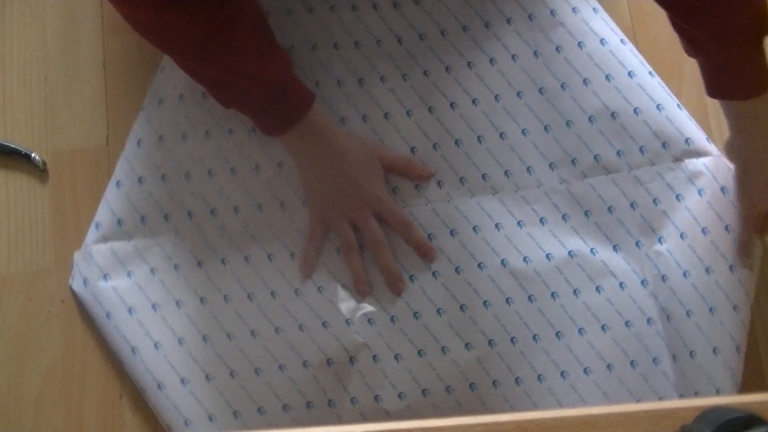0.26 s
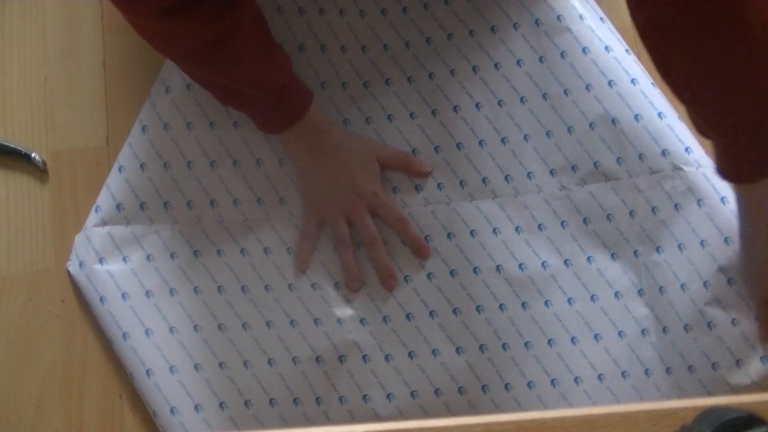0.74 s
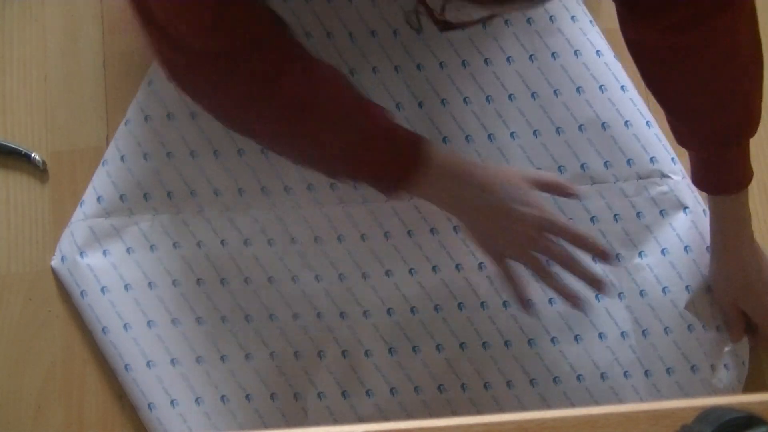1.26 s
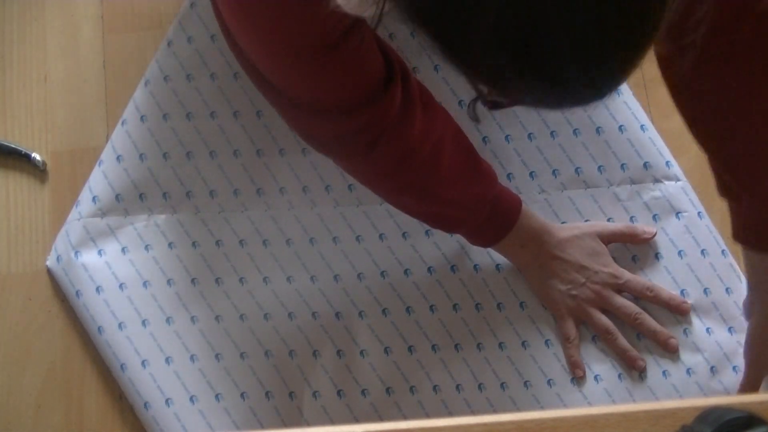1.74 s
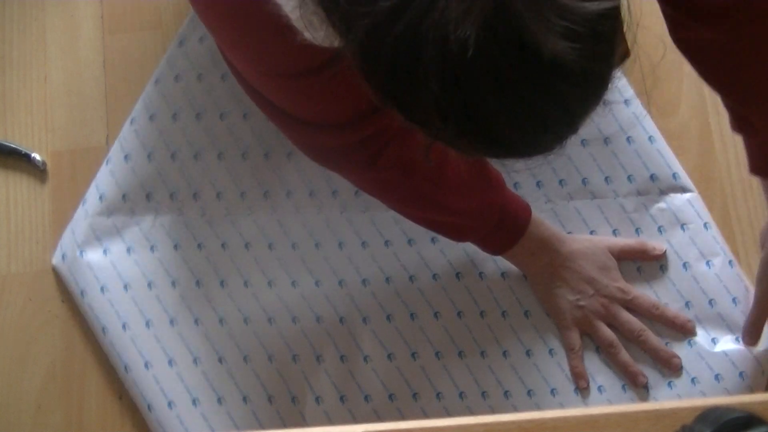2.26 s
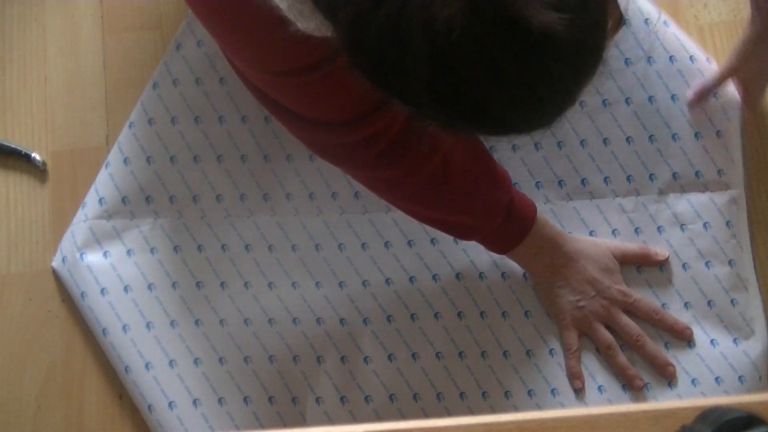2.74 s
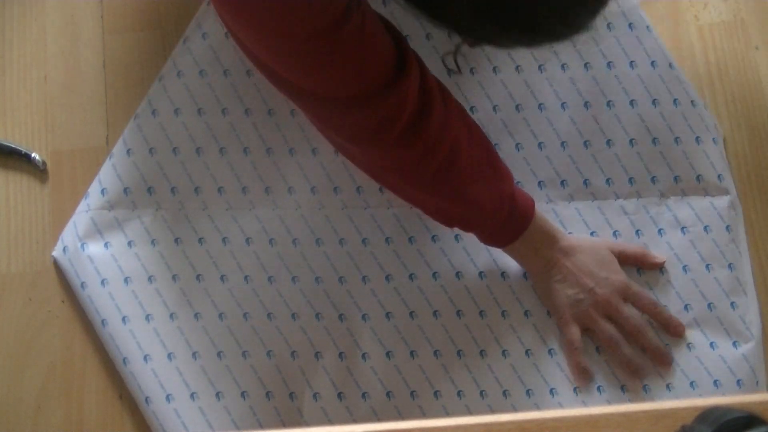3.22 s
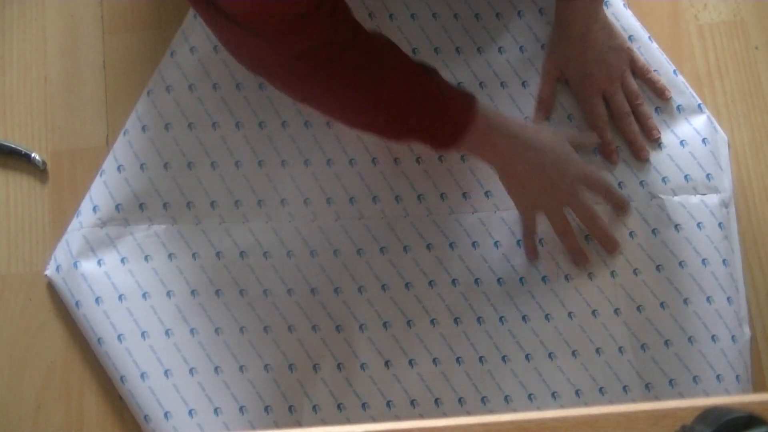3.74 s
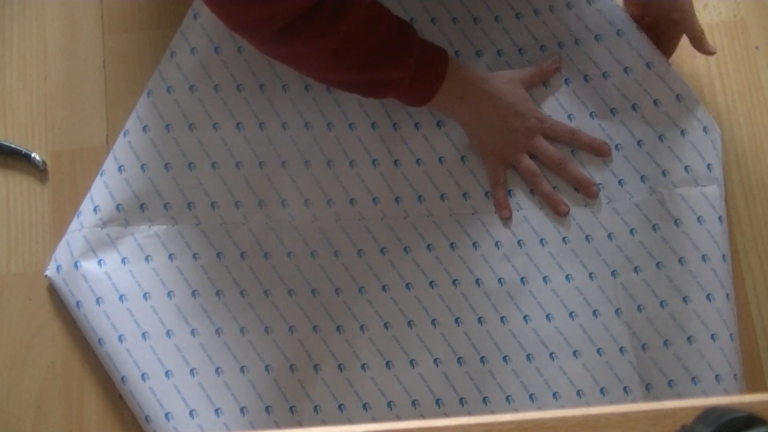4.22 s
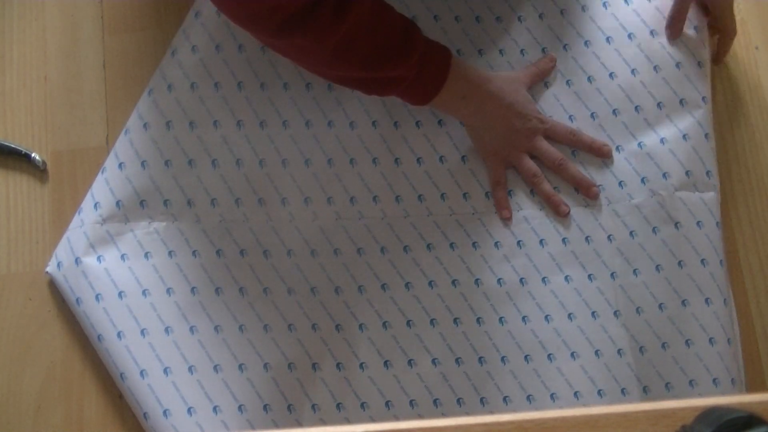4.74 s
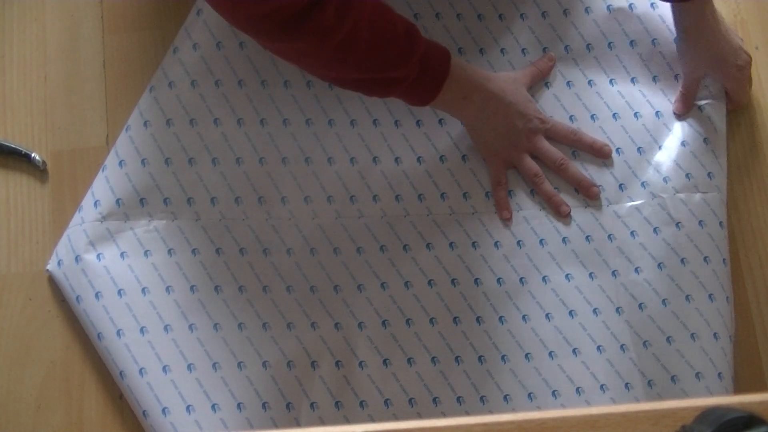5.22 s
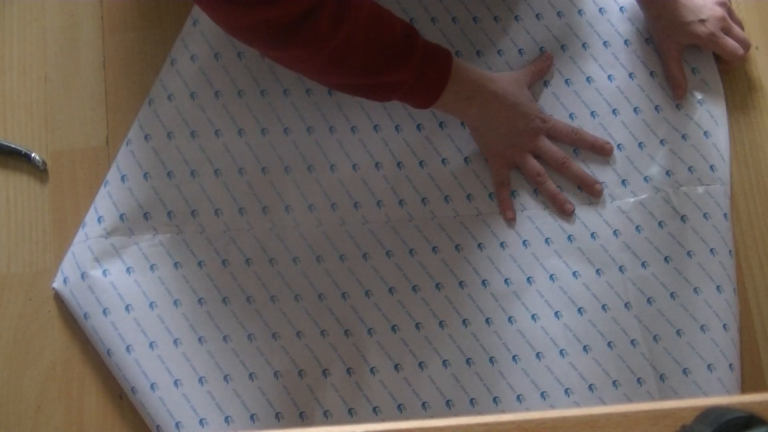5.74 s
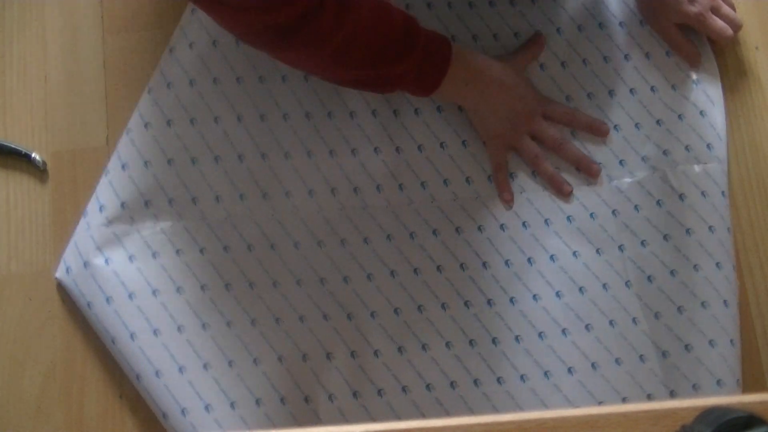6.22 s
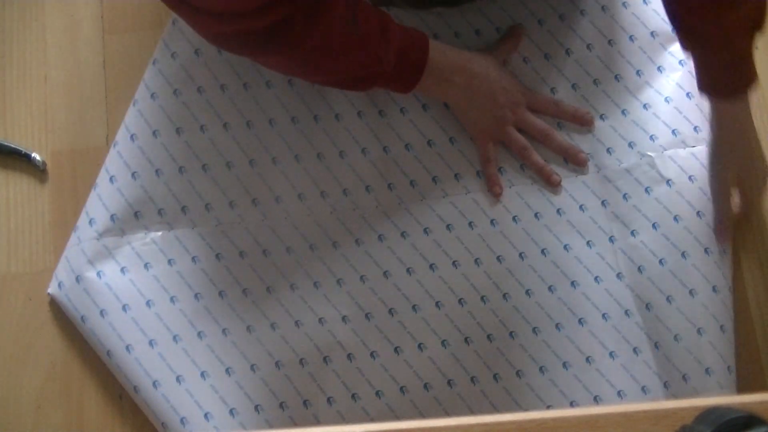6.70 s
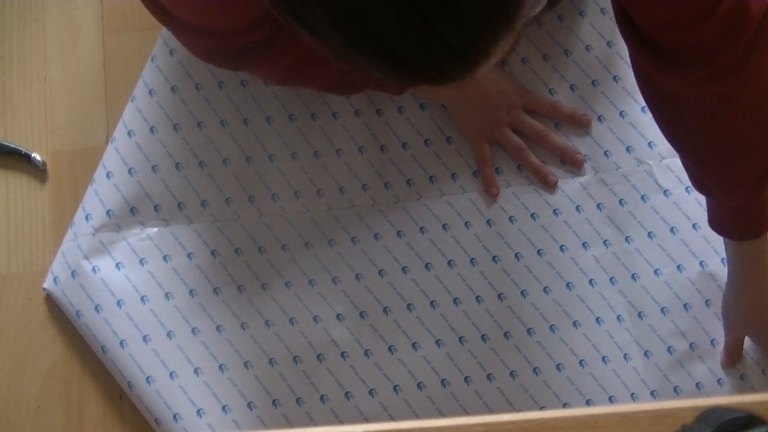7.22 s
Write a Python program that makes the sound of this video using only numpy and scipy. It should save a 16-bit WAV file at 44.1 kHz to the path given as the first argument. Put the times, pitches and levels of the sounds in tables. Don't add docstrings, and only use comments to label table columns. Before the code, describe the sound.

Stiff paper rustles and crinkles under sliding palms, with a very loud sharp crack near three seconds, crunchy folds and soft floor thumps.

```python
import sys
import numpy as np
from scipy import signal
from scipy.fft import rfft, irfft, next_fast_len
from scipy.io import wavfile
from scipy.ndimage import uniform_filter1d, map_coordinates

SR = 44100
rng = np.random.default_rng(int(sys.argv[2]) if len(sys.argv) > 2 else 0)


def dump_mix(stems):
    frames = np.atleast_2d(stems).T
    limited = np.clip(frames, -1, 1)
    pcm = np.round(limited * 32767).astype(np.int16)
    wavfile.write(sys.argv[1], SR, pcm)


def attenuation_scalar(level_db):
    decades = np.asarray(level_db, float) / 20
    return 10 ** decades


N = 328986


def unit(x):
    return x / np.sqrt(np.mean(x ** 2) + 1e-20)


def along(points, hz):
    f, v = np.transpose(points)
    return np.interp(np.log(hz + 1), np.log(f + 1), v)


def wobble(rate):
    knots = rng.standard_normal(int(N * rate / SR) + 4)
    return map_coordinates(knots, [np.arange(N) * rate / SR])


def filtered(x, response):
    m = next_fast_len(N + SR // 2)
    return irfft(rfft(x, m) * response(np.fft.rfftfreq(m, 1 / SR)), m)[..., :N]


def kernel(spectrum):
    magnitude = attenuation_scalar(along(spectrum, np.fft.rfftfreq(4096, 1 / SR)))
    cep = irfft(np.log(magnitude + 1e-6))
    cep[1:2048] *= 2
    cep[2049:] = 0
    return irfft(np.exp(rfft(cep)))


def coloured(x, spectrum):
    return signal.fftconvolve(x, kernel(spectrum)[None], axes=1)[:, :N]


def bands(x):
    def cut(hz, kind):
        return signal.sosfilt(signal.butter(4, hz, kind, fs=SR, output="sos"), x)
    return cut(2000, "low"), cut([2000, 7000], "band"), cut(7000, "high")


def spread(pair):
    # frequency in Hz, likeness of left and right (1 = same)
    likeness = [(60, 0.029), (290, 0), (640, 0.44), (1410, 0.83), (3100, 0.59), (6820, 0.97), (11000, 0.14),
                (15000, 0)]

    def mid_side(hz):
        turn = np.arccos(np.clip(along(likeness, hz), -1, 1)) / 2
        return np.array([np.cos(turn), np.sin(turn)])
    mid, side = filtered(pair, mid_side)
    return np.array([mid + side, mid - side])


def swells(s, rise, fade, db):
    t = np.arange(0, N / SR + .002, .002)[:, None]
    away = np.where(t < s, (s - t) / rise, (t - s) / fade)
    power = np.sum(attenuation_scalar(2 * (db - 10 * away ** 1.2)), axis=-1)
    return np.interp(np.arange(N) / SR, t[:, 0], np.sqrt(power))


def creases(rate, scatter_db, clump):
    chance = rate / SR * np.exp(clump * np.clip(wobble(60), -2, 1.2))
    size = attenuation_scalar(scatter_db * np.minimum(rng.exponential(size=N), 3))
    sign = np.sign(rng.standard_normal(N))
    return unit(size * sign * (rng.random(N) < chance))


def roomy():
    z = signal.stft(rng.standard_normal((2, N)), nperseg=1024)[2]
    field = unit(uniform_filter1d(rng.standard_normal(z.shape[1:]), size=13, axis=1))
    resonant = z * attenuation_scalar(3.8 * np.clip(field, -1.5, 2.2))
    return unit(signal.istft(resonant, nperseg=1024)[1][:, :N])


def crackle(spectrum, rate, share):
    fine = creases(rate, scatter_db=1.5, clump=0.3)
    coarse = 0.19 * creases(rate, scatter_db=5.0, clump=0.4)
    hiss = roomy() * attenuation_scalar(0.9 * np.tanh(wobble(25)) + 0.6 * wobble(80))
    sheet = coloured(spread(hiss + share * np.array([fine, coarse])), spectrum)
    return [unit(b) for b in bands(sheet)]


def tails(energy, rise, share):
    room_t60 = [0.41, 0.31, 0.13]
    # frequency in Hz, crack spectrum in dB per Hz
    crack_colour = [(150, -49), (250, -30.5), (640, -6.5), (955, -1), (1160, 3), (1950, -4), (2670, -0.5),
                    (3010, -5), (3840, 0.5), (4730, -1), (6000, -17), (9010, -34), (11500, -39.5),
                    (16000, -54)]
    keep = np.exp(-1 / (rise * SR))
    out = 0
    for burst, t60, band in zip(energy, room_t60, crackle(crack_colour, 1500, share)):
        fade = signal.lfilter([1], [1, -attenuation_scalar(-120 / t60 / SR)], burst)
        power = signal.lfilter([1 - keep], [1, -keep], fade)
        out = out + np.sqrt(np.abs(power)) * band
    return out


def rustle():
    # time of most speed in s, speeding up in s, slowing down in s, level in dB, crispness in dB rel
    palm_slides = [(0.47, 0.21, 0.16, -36, -13), (0.911, 0.19, 0.12, -37, -18.5),
                   (1.33, 0.17, 0.25, -49.5, -30), (1.87, 0.38, 0.15, -42, -5.5),
                   (2.32, 0.094, 0.18, -33, -10), (2.55, 0.072, 0.12, -35.5, -9),
                   (2.76, 0.34, 0.18, -29.5, -14.5), (3.26, 0.16, 0.091, -38.5, -27),
                   (3.6, .13, 0.042, -41, -15), (3.99, 0.11, 0.21, -43, -13.5),
                   (5.079, 0.21, 0.11, -37, -12), (5.4, 0.096, 0.063, -40, -10),
                   (5.31, 0.1, 0.032, -59, -16), (5.56, 0.29, 0.03, -41, -18), (6.11, 0.14, .1, -36.5, -15),
                   (6.34, 0.097, 0.097, -39, -16.5), (6.7, 0.18, 0.4, -37, -11),
                   (6.93, 0.12, 0.04, -43, -10), (7.24, .06, 0.088, -46, -6)]
    # peak time in s, fade in s, level in dB, sheet body in dB rel
    finger_tugs = [(0.038, 0.099, -42, -3), (0.16, 0.08, -42.5, 0.5), (0.31, 0.076, -37, -7),
                   (0.73, 0.22, -44, 2.5), (1.03, 0.08, -47, 3.5), (1.17, 0.35, -64, 10.5),
                   (1.538, 0.053, -38.5, 0), (2.098, 0.31, -40, -6.5), (3.092, 0.064, -30.5, -1),
                   (3.17, 0.11, -38.5, 1), (3.47, 0.2, -45.5, 0.5), (3.84, 0.34, -46, -10),
                   (4.11, 0.028, -51, 0), (4.199, 0.062, -40.5, -0.5), (4.34, 0.08, -35, -4),
                   (4.508, 0.091, -32, -1), (4.73, 0.068, -41, -1.5), (4.91, 0.079, -42, -5),
                   (5.752, 0.044, -44, -15), (5.9, 0.11, -43, -5), (6.5, 0.29, -39.5, -6.5),
                   (7.12, 0.073, -51, 5), (7.42, 0.14, -53.5, -8)]
    # frequency in Hz, paper spectrum in dB per Hz
    paper_colour = [(180, -61.5), (300, -26.5), (574, -11.5), (614, -10), (787, -6.5), (1140, -7.5),
                    (1560, -7), (2440, -3.5), (3190, -1.5), (3640, 2.5), (4750, 4.5), (6960, -12),
                    (9880, -13.5), (16000, -41)]
    lifted_s = 6.55
    s, rise, fade, db, crisp_db = np.transpose(palm_slides)
    at, tug_fade, tug_db, body_db = np.transpose(finger_tugs)

    def slide(rel_db):
        return swells(s, rise, fade, db + rel_db)

    def tug(rel_db):
        return swells(at, 0.55 * tug_fade, tug_fade, tug_db + rel_db)

    faster_db = db + 39.5
    slide_body_db = -6 - 0.62 * faster_db - 1.5 * (s > lifted_s)
    tug_crisp_db = -10 + 0.47 * body_db
    body, middle, top = crackle(paper_colour, rate=1600, share=.95)
    boom = filtered(body, lambda hz: hz < 650)
    body = body - 0.73 * boom * np.clip((np.arange(N) / SR - lifted_s) * 10, 0, 1)

    sizzle = filtered(top, lambda hz: 1 / (1 + (12700 / (hz + 1)) ** 8))
    sizzle_db = crisp_db - 3 + 0.55 * faster_db
    return (np.hypot(slide(slide_body_db), tug(body_db)) * attenuation_scalar(0.58 * np.tanh(wobble(23))) * body
            + np.hypot(slide(0), tug(0)) * middle
            + np.hypot(slide(crisp_db), tug(tug_crisp_db)) * top
            + slide(sizzle_db) * sizzle)


def crunches():
    # time in s, peak in dB, body in dB rel, crispness in dB rel
    bunches = [(0.7254, -23, -20, -21), (0.8204, -29, -7, -29), (1.409, -23.5, -11, -10),
               (1.527, -18, -15, -8), (2.297, -21.5, -6, -19), (2.6834, -14, -33, -31),
               (3.069, -2, -12.5, -5.5), (3.1, -11, -14, -4), (4.101, -21, -9.5, -11),
               (4.1909, -21.5, -11.5, -13), (4.309, -21, -30, -9), (4.322, -17, -26, -6),
               (4.334, -15.5, -22, -5), (4.36, -21.5, -24, -10), (4.46, -20, -7, -28),
               (4.4732, -13, -11, -21), (4.489, -8.5, -9.5, -9), (4.5184, -6.5, -11, -7),
               (4.535, -15, -15, -9), (4.679, -24.5, -12, 3), (5.0629, -33, -5, 5), (5.1128, -22, -16, -27),
               (5.2697, -24.5, -20, -31), (5.556, -19, -19, -51), (5.742, -35, -25, -20),
               (6.3056, -20.5, -27, -34), (7.006, -17, -15.5, -20), (7.203, -27, -25, -40)]
    energy = np.zeros((3, N))
    for s, db, body_db, crisp_db in bunches:
        band_db = np.array([body_db + 6.5, 0, crisp_db + 6.5])
        energy[:, round((s - .003) * SR)] += attenuation_scalar(db - 17.5 + band_db) ** 2
    return tails(energy, rise=0.0068, share=0.72)


def snaps():
    # time in s, peak in dB, body in dB rel, crispness in dB rel
    folds = [(0.2011, -25.5, -0.5, -45), (0.2077, -28.5, -5, -45), (0.217, -37, -1, -45),
             (0.7028, -22.5, -19, -36), (0.8596, -20.5, -17, -46), (0.9349, -16.5, -22, -36),
             (0.944, -27, -3, -20), (1.3954, -35, -14, -38), (1.422, -32, -12, -36),
             (1.5205, -22, -8.5, -28), (1.527, -23, -16, -23), (1.5327, -23, -20, -21),
             (2.1896, -24, -21, -37), (3.0478, -21, -30, -35), (3.0505, -14, -30, -35),
             (3.0528, -17, -30, -35), (3.0606, -0.5, -30, -23.5), (3.0699, -9, -16, -36),
             (3.0752, -10, -20, -38), (3.0882, -14, -14, -36), (3.4486, -20.5, -15, -36),
             (3.4512, -21, -17, -32), (3.4965, -28, -14, -36), (3.5167, -27, -8, -38),
             (3.534, -35, -25, -38), (3.479, -20, -19, -28), (3.568, -30, -25, -40), (3.611, -34, -30, -40),
             (3.043, -32, -26, -36), (3.977, -35.5, -3, -27), (4.291, -46, -6, -26), (4.5875, -29, -6, -36),
             (4.6573, -19.5, -29, -35), (4.675, -11, -24.5, -25), (4.7515, -25, -19, -36),
             (5.0636, -39, -14, -30), (5.368, -27, -9, -40), (5.5575, -24, -18, -45),
             (5.564, -25, -18, -45), (5.8535, -32.5, -23, -31), (5.8886, -22.5, -37, -43),
             (6.0588, -30, -10, -25), (6.137, -25, -18, -24), (6.8462, -21, -40, -36),
             (6.863, -26, -35, -36), (6.9928, -31, -12, -28), (7.0924, -22.5, -9, -28),
             (7.206, -34, -2, -27)]
    # delay in s, level in dB
    near_walls = [(.0011, -4), (.004, -15), (.0087, -10), (.0138, -9), (.016, -12), (.023, -14)]
    # frequency in Hz, spectrum of the bare crack in dB per Hz
    click_colour = [(59, -48), (100, -17.5), (1280, 6.5), (2990, -9.5), (3940, 4), (9210, -27.5),
                    (10000, -18), (10900, -24), (16000, -35)]
    t = np.arange(SR // 100) / SR
    colour = bands(kernel(click_colour)[:SR // 30])
    out, energy = np.zeros((2, N + SR)), np.zeros((3, N))
    for s, db, body_db, crisp_db in folds:
        gains = attenuation_scalar(db + np.array([body_db + 4, 0, crisp_db + 14]))
        for lag, wall_db in [(0, 0)] + near_walls:
            burst = rng.standard_normal(len(t)) * attenuation_scalar(-60 * t / .002)
            parts = [np.convolve(burst, c) for c in colour]
            dull = attenuation_scalar([0, 0, -8 * (lag > .002)])
            crack = sum(g * p / np.abs(p).max() for g, p in zip(gains * dull, parts))
            side = (lag > .002) * rng.normal(0, 3)
            at = round((s + .0004 + lag * (1 + .07 * rng.standard_normal())) * SR)
            out[:, at:at + len(crack)] += attenuation_scalar(wall_db + np.array([[side], [-side]]) / 2) * crack
        room = gains * attenuation_scalar(-17 + np.array([1.5, 0, -14]))
        energy[:, round((s + .001) * SR)] += room ** 2
    return out[:, :N] + tails(energy, rise=0.0016, share=0.2)


def groans():
    # start in s, start pitch in Hz, end pitch in Hz, level in dB, decay t60 in s
    bends = [(.72, 800, 800, -34, 0.084), (0.771, 271, 204.6, -51, 0.32), (.79, 2170, 2180, -42, 1.2),
             (1.18, 1890, 1900, -44, 0.12), (1.939, 1450, 1440, -35.5, 0.068), (2.0, 115, 110, -58, 2.6),
             (2.471, 1143, 1145, -45, 0.35), (4.04, 258, 240, -50.5, 0.26), (4.319, 1203, 1065, -36, 0.35),
             (4.401, 1080, 1050, -36, .05), (4.418, 780, 750, -33.5, 0.065), (4.484, 769, 835, -24, 0.13),
             (4.475, 2060, 2050, -25, 0.24), (3.0576, 1320, 1216, -15.5, 0.034),
             (3.069, 1217, 1200, -18, 0.073), (3.114, 1500, 1490, -24, .05), (3.08, 2500, 2457, -21, .08),
             (4.519, 1188, 1230, -12, 0.17), (4.534, 1416, 1330, -22, 0.24), (4.645, 720, 750, -34, 0.042),
             (6.58, 856, 801, -41.5, 0.27), (6.64, 2375, 2440, -39, 0.19), (7.095, 824, 825, -34, 0.1),
             (7.1, 1050, 994, -44, 0.32)]
    t, out = np.arange(SR) / SR, np.zeros(N + SR)
    shake_db, drift = 2.6 * np.tanh(wobble(110)), 1.2 * wobble(90)
    for s, start_hz, end_hz, db, t60 in bends:
        rise = min(0.011 * t60, 0.034)
        hz = end_hz + (start_hz - end_hz) * np.exp(-8 * t / t60)
        swell = (1 - np.exp(-t / rise)) ** 2 * attenuation_scalar(db - 60 * (t / t60) ** 1.26)
        at = round(s * SR)
        looseness = min(start_hz / 1000, 1) * min(.5 / t60, 1)
        slip = np.resize(drift[at:], SR) * looseness
        out[at:at + SR] += swell * np.sin(2 * np.pi * np.cumsum(hz) / SR + slip)
    return out[:N] * attenuation_scalar(shake_db) * attenuation_scalar([[1.2], [-1.2]])


def rubs():
    # peak time in s, rise in s, fade in s, resonance in Hz, level in dB
    edge_rubs = [(4.35, 0.04, 0.09, 1200, -38), (4.497, 0.031, .018, 796, -26.5),
                 (4.515, 0.033, .03, 1040, -29), (3.09, .015, 0.041, 1150, -29.5),
                 (3.46, 0.0067, .03, 620, -37), (5.372, .004, .012, 740, -37),
                 (5.575, 0.023, 0.027, 1600, -41), (0.266, .005, 0.0046, 775, -34),
                 (0.178, .005, .003, 900, -34), (0.208, 0.0068, 0.018, 1550, -35.5),
                 (4.55, 0.038, 0.04, 1390, -27), (5.07, 0.12, 0.1, 884, -45.5),
                 (6.6, 0.034, 0.045, 810, -42), (6.72, 0.074, 0.093, 870, -50.5),
                 (6.9, 0.066, .08, 840, -51.5), (7.01, 0.026, 0.038, 860, -43),
                 (7.12, 0.042, 0.032, 900, -43)]
    grit = rng.standard_normal(N) + 0.62 * creases(300, scatter_db=3.0, clump=0.72)
    out = 0
    for s, rise, fade, hz, db in edge_rubs:
        ring = signal.tf2sos(*signal.iirpeak(hz, 1 / .32, SR))
        friction = unit(signal.sosfilt(np.vstack([ring, ring]), grit))
        out = out + swells(s, rise, fade, db) * friction
    return out


def pats():
    # time in s, level in dB, decay t60 in s
    touches = [
        (0.201, -31.5, 0.28),
        (1.97, -50, 0.51),
        (3.0596, -20.5, 0.046),
        (3.446, -32.5, 0.37),
        (4.3, -49, .3),
        (5.3676, -36, 0.19),
        (7.09, -51, 0.13),
    ]
    # frequency in Hz, palm spectrum in dB per Hz
    palm_colour = [(60, -50), (150, -46), (300, -6.5), (550, 0.5), (900, -3.5), (1800, -9), (4000, -34)]
    fall = 0
    for s, db, t60 in touches:
        since = np.maximum(np.arange(N) / SR - s, 0)
        fall = fall + attenuation_scalar(db - 60 * since / t60) * (1 - np.exp(-since / 0.00078))
    return fall * unit(coloured(rng.standard_normal((1, N)), palm_colour))


def push():
    start_s, lasts_s = 3.0612, 0.00044
    u = np.maximum(np.arange(N) / SR - start_s, 0) / lasts_s
    return attenuation_scalar(-29.5) * np.e * u * np.exp(-u) * np.array([[1], [1]])


def thumps():
    # time in s, peak in dB, joist in dB rel, knock in dB rel
    landings = [
        (0.208, -44, -13, -1),
        (0.774, -65, -2, -8),
        (1.4, -56, 4, -6),
        (2.015, -80, -5, 1),
        (3.466, -50.5, 6, -7),
        (4.038, -66, -7, 4),
        (4.293, -57, -8, 0.5),
        (5.582, -58, 23, -14),
        (6.243, -50, 2, -3),
        (6.261, -32.5, 20, -0.5),
    ]
    # board mode in Hz, level in dB, decay t60 in s
    board_modes = [(97.8, -2, 0.43), (115.3, -2, 0.3), (155, -4, 0.34), (240, 5.5, 0.073), (353, -37, 0.21)]
    # frequency in Hz, decay t60 in s, rise in s
    joist_hz, joist_t60, joist_rise = (48, 0.77, 0.038)
    out, t = np.zeros(N + SR), np.arange(SR) / SR

    def ring(hz, db, t60, rise):
        return attenuation_scalar(db - 60 * t / t60) * (1 - np.exp(-t / rise)) * np.sin(2 * np.pi * hz * t)

    for s, db, joist_db, knock_db in landings:
        knock = sum(ring(hz, mode_db + rng.normal(0, 2.7), t60, 0.0059) for hz, mode_db, t60 in board_modes)
        joist = ring(joist_hz, db + joist_db - 15.5, joist_t60, joist_rise)
        out[round(s * SR):][:SR] += attenuation_scalar(db + knock_db + 5.0) * knock + joist
    return out[:N] * attenuation_scalar([[1.5], [-1.5]])


def boards():
    # peak time in s, level in dB, fade in s
    weight_shifts = [(.22, -37.5, 0.06), (.52, -49, 0.042), (.79, -50, .04), (.98, -48.5, 0.078),
                     (1.41, -48.5, 0.1), (1.55, -54, 0.15), (2.04, -52, 0.38), (2.32, -44.5, 0.046),
                     (2.49, -50.5, 0.2), (2.91, -54, .1), (3.09, -46, 0.11), (3.45, -55, 0.45),
                     (4.05, -52, 0.14), (4.31, -49, 0.31), (4.53, -54, 0.058), (4.88, -58, 0.13),
                     (5.59, -53, 0.046), (6.17, -50, 0.033), (6.29, -39, 0.053), (6.42, -50, 0.35)]
    # frequency in Hz, floor spectrum in dB per Hz
    rumble_colour = [(30, -35), (65, -28.5), (108, -3.5), (150, -11.5), (270, -7.5), (400, -4),
                     (600, -22.5), (900, -120)]
    lumps_db = 3.5 * np.tanh(wobble(22))
    grumble = unit(coloured(spread(rng.standard_normal((2, N))), rumble_colour))
    s, db, fade = np.transpose(weight_shifts)
    load = np.hypot(swells(s, 0.064, fade, db), attenuation_scalar(-59))
    return load * attenuation_scalar(lumps_db - 7) * grumble


def hush():
    # frequency in Hz, noise spectrum in dB per Hz
    hush_colour = [(15, -36), (40, -8), (80, -12.5), (200, -8), (310, -11), (540, -3), (700, -8),
                   (3900, -10.5), (6600, -21), (16000, -25)]
    return attenuation_scalar(-53.5 - 3.0) * unit(coloured(spread(rng.standard_normal((2, N))), hush_colour))


def scene():
    paper = rustle() + crunches() + snaps() + groans() + rubs()
    hands = pats() + push()
    floor = thumps() + boards()
    return paper + hands + floor + hush()


def roll_off(x):
    return signal.sosfilt(signal.butter(12, 16670, fs=SR, output="sos"), x)


def record(dry):
    # frequency in Hz, left minus right in dB
    lean = [(40, 4), (150, -1.5), (500, 4), (2000, -1.5), (8000, -1), (14000, -2)]
    # frequency in Hz, phase in radians by which left leads
    lead = [(60, -0.63), (600, -0.62), (2580, -0.6), (3900, -0.069), (6500, -1.04), (11000, -1.08)]

    def response(hz):
        half = attenuation_scalar(along(lean, hz) / 2) * np.exp(.5j * along(lead, hz))
        low_cut = 1 / (1 + (36 / (hz + 1)) ** 6)
        return np.array([half, 1 / half]) * (hz < 15790) * low_cut
    ports = filtered(dry, response)
    return roll_off(np.clip(ports, -1, 1))


dry = scene()
out = record(dry)
dump_mix(out)
```